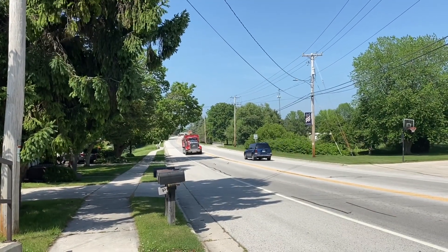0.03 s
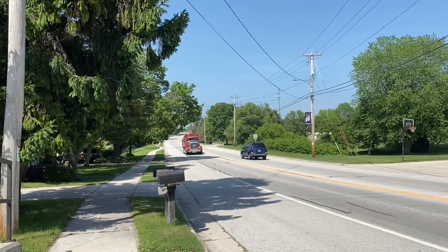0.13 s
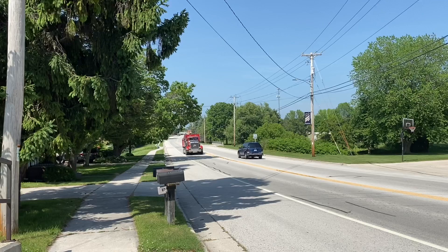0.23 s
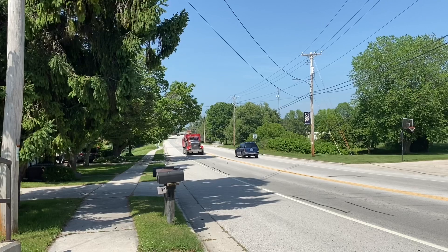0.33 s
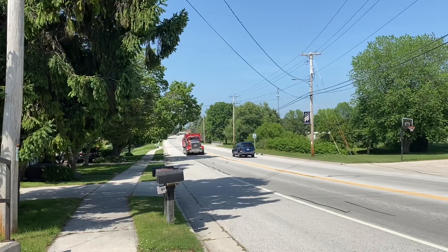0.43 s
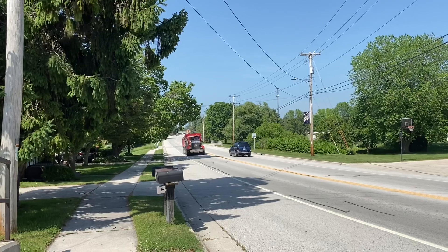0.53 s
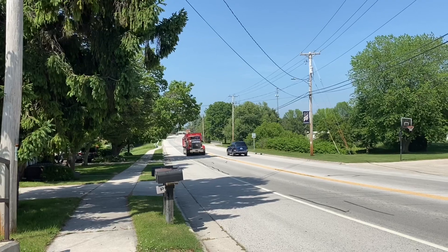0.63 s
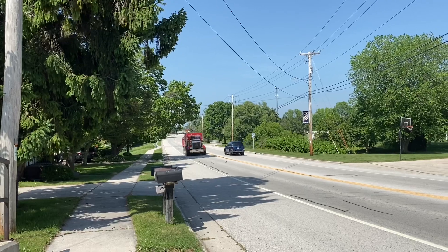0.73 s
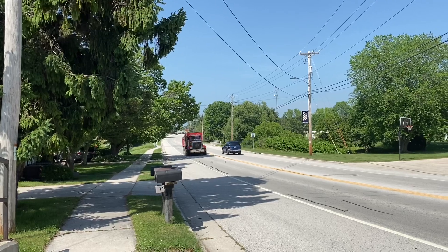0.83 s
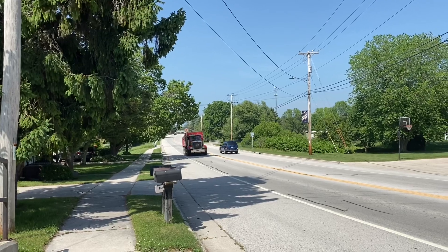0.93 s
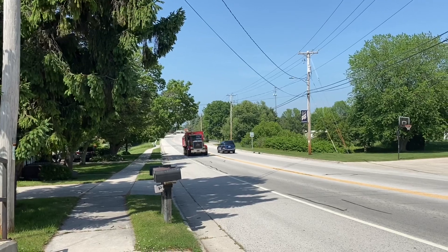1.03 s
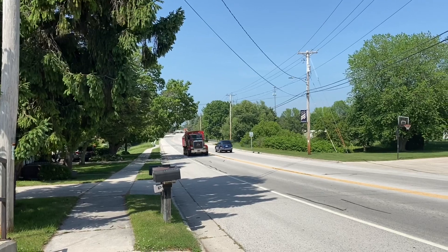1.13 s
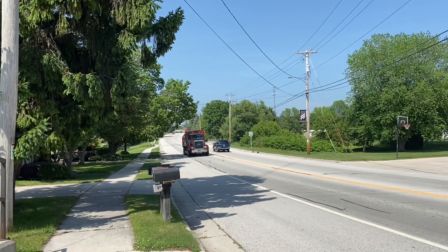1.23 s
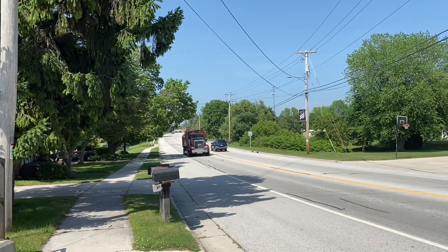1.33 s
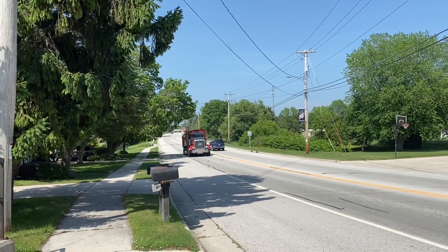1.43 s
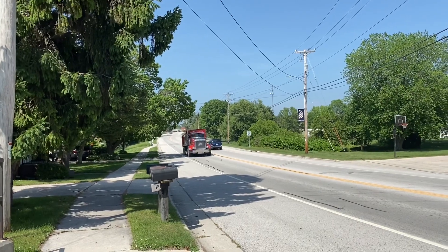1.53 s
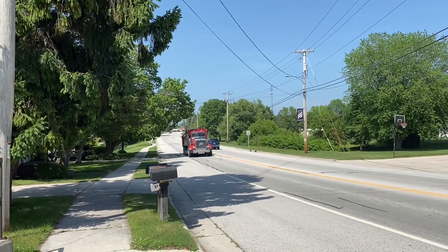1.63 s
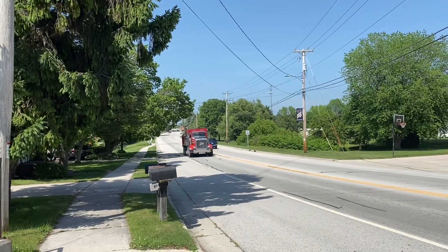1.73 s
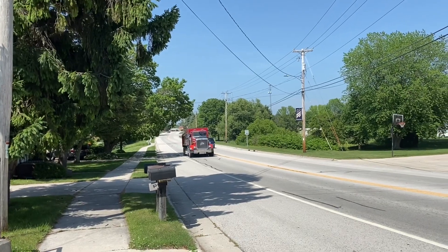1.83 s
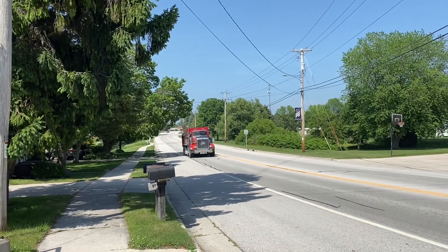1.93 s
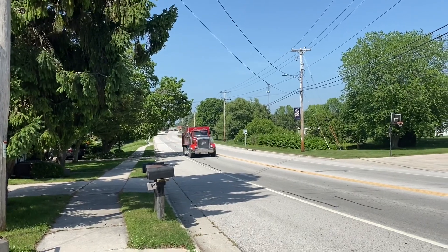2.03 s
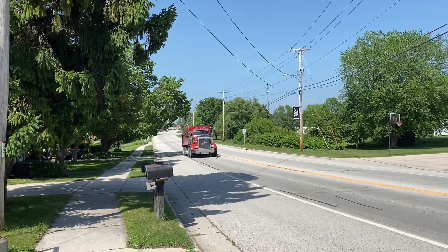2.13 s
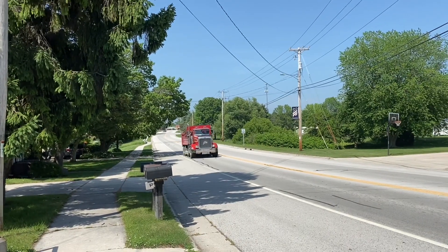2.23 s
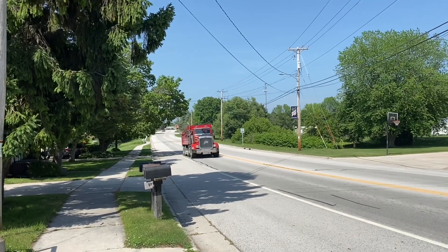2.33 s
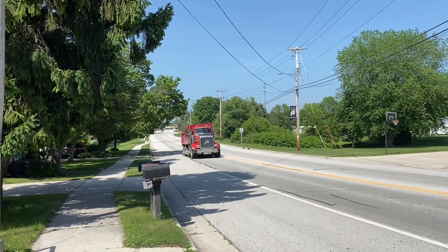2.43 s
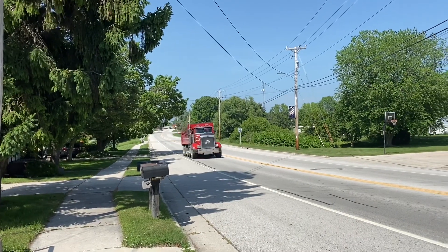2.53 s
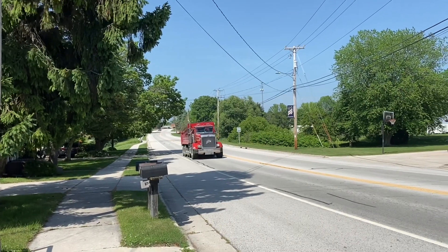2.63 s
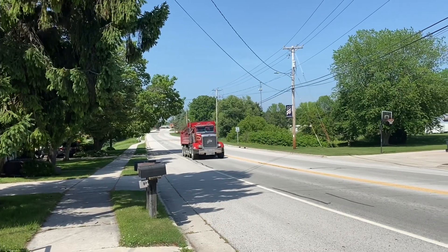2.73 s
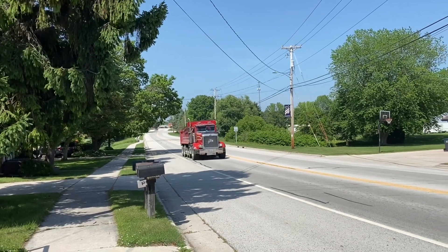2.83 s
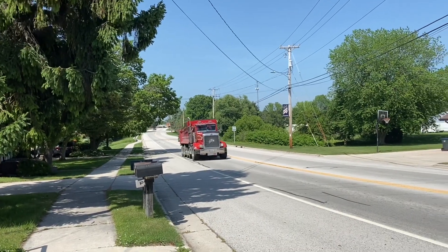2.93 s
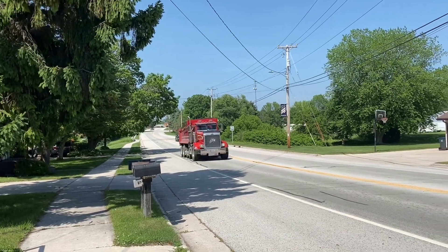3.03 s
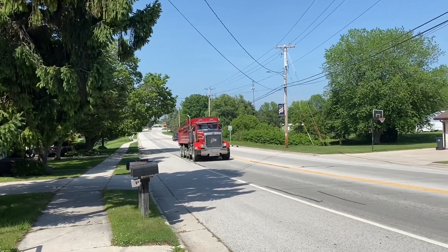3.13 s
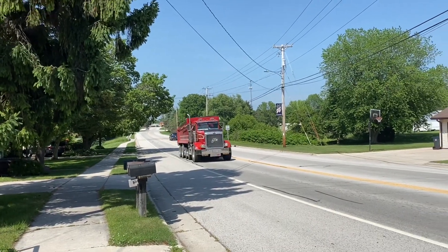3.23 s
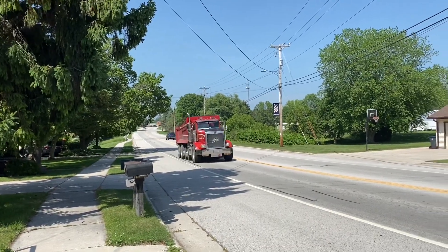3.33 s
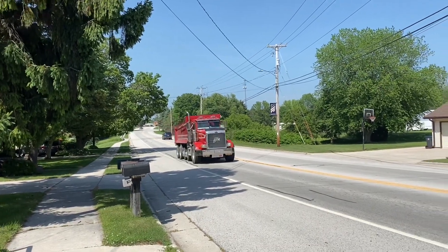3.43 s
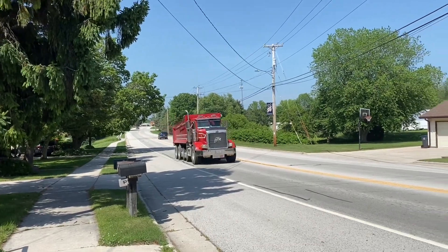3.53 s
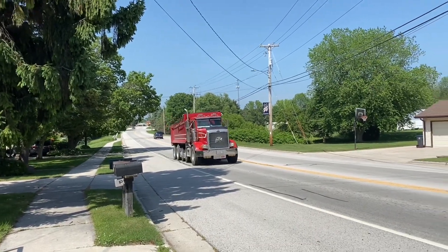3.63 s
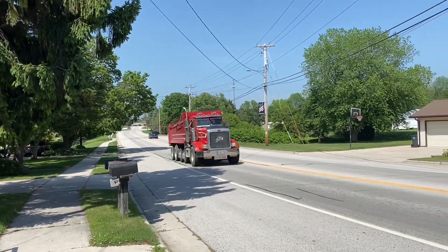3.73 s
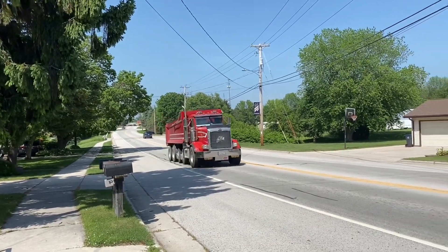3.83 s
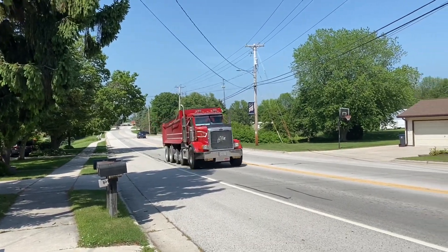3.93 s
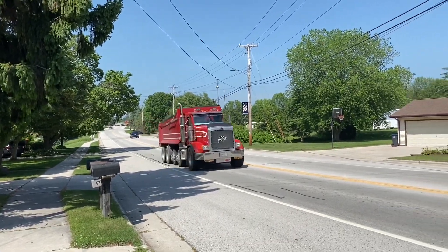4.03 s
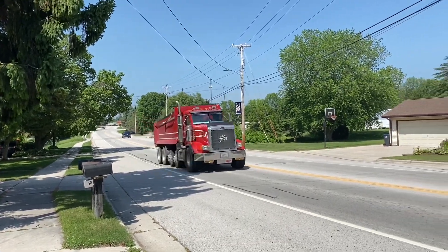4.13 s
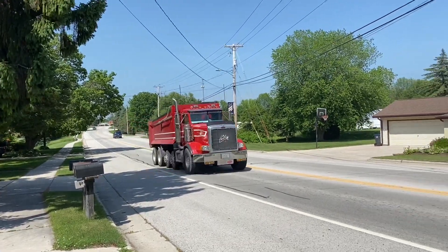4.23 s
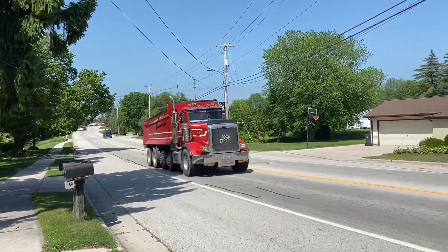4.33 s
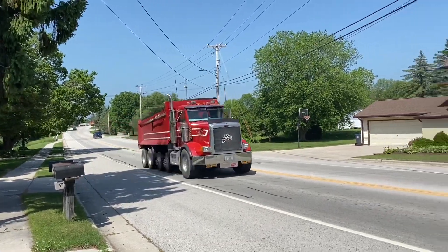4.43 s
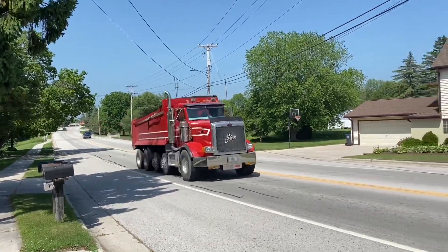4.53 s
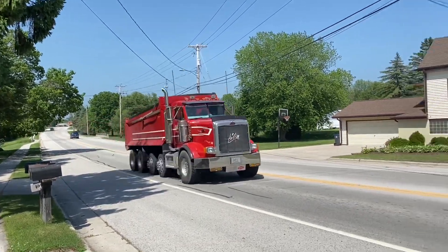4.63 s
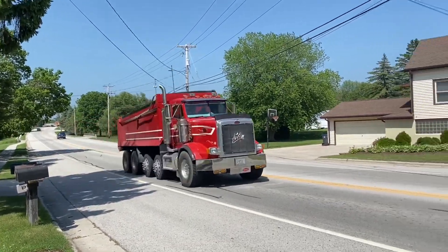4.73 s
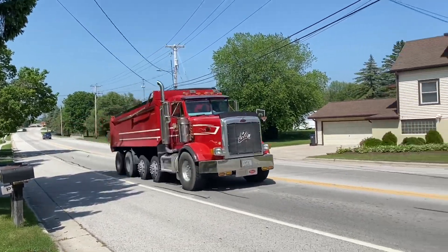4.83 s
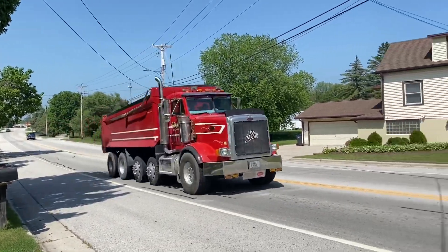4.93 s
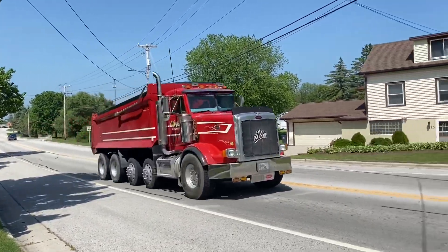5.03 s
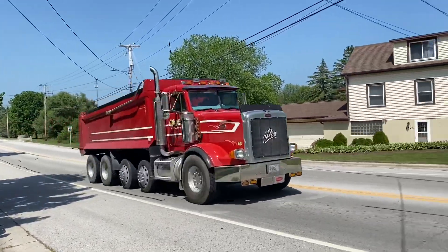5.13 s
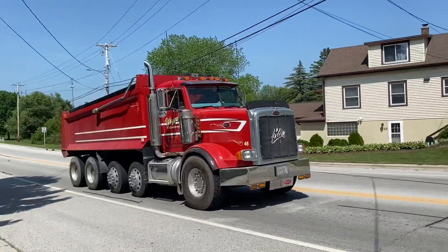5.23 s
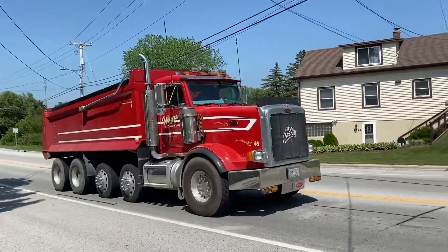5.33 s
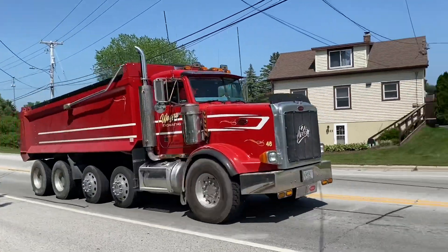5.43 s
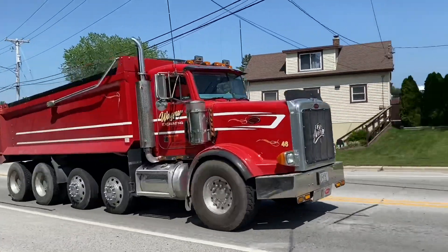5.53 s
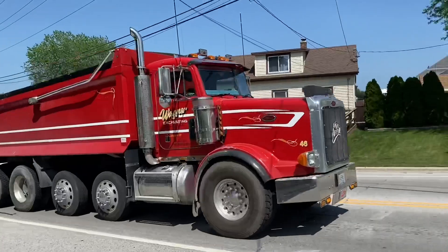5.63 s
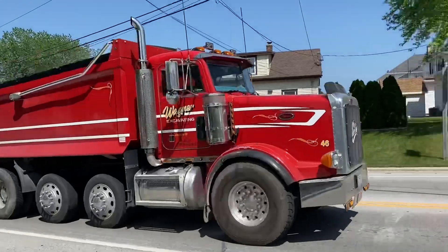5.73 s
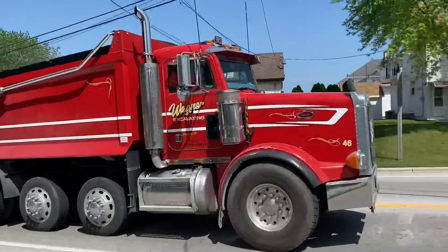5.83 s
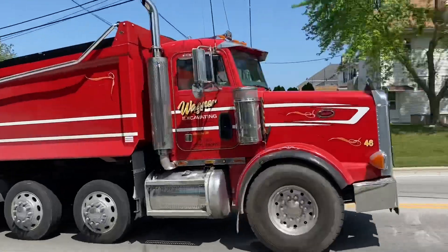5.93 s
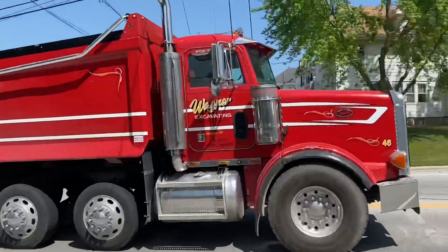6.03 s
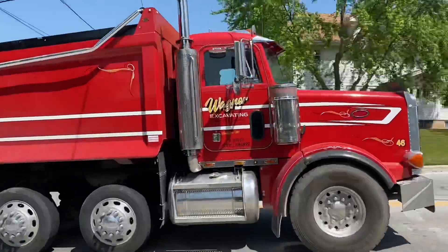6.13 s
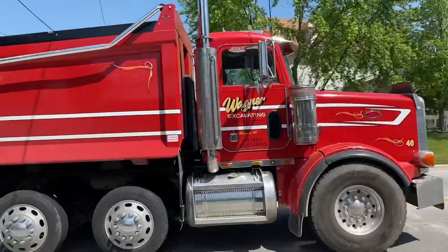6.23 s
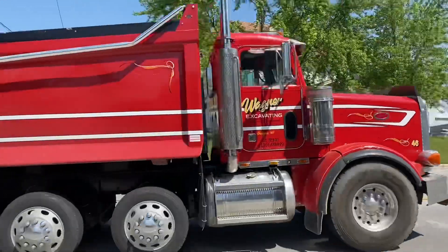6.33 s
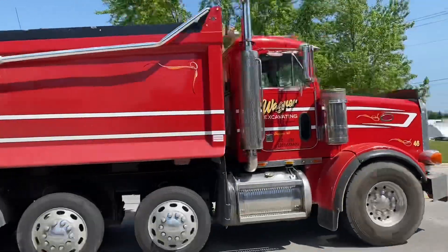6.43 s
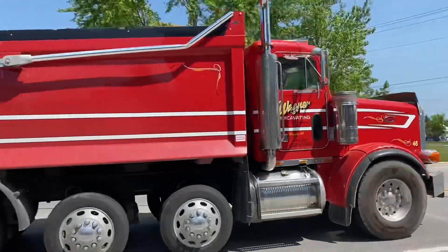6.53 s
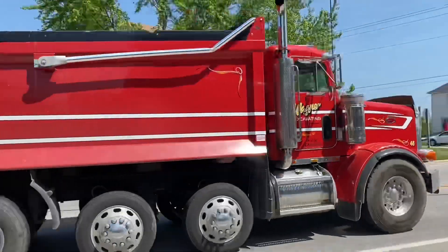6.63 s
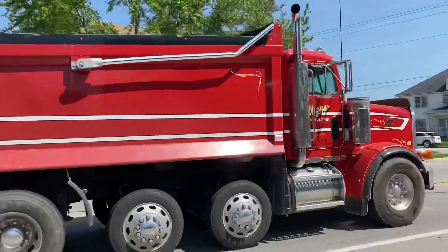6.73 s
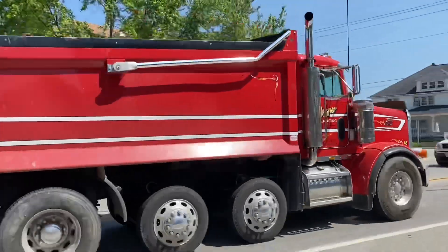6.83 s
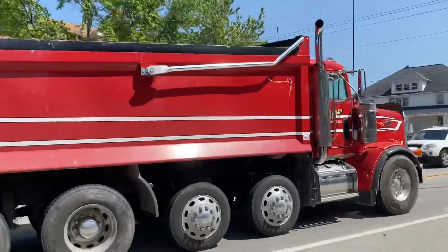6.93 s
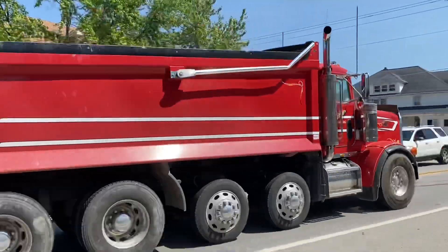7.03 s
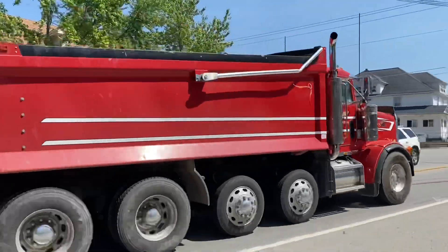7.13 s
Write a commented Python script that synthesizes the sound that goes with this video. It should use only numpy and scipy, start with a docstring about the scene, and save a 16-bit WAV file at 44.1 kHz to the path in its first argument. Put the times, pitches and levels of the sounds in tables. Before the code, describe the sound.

Outdoors on a small-town road, a large diesel dump truck nears with its engine brake on: a rapid, throaty stutter over tyre roll and faint traffic. It grows louder, harsher and slower, cracking sharply as it comes alongside. The brake suddenly lets go with a tiny air chirp; turbo whine falls, wheel brakes squeak and the engine mutters. Stereo roadside microphone, a few metres away.

```python
"""The engine brake of a dump truck, slowing on a small-town road, hammers as the truck passes close by.
Each cylinder dumps its air into the stack: a boom, a bark and a crack, combed by echoes off the road and a house.
Clicks ring the resonances of stack and muffler, and gated noise makes the rushing gas and its hiss.
Then the brake lets go, the turbo winds down as a falling band of noise and the engine mutters.
The wheel brakes squeak as wavering tones; coloured noise makes the rolling tyres and far traffic."""
import sys
import numpy as np
from scipy import signal
from scipy.fft import rfft, irfft, next_fast_len
from scipy.io import wavfile
from scipy.ndimage import uniform_filter1d, map_coordinates

SR = 44100
rng = np.random.default_rng(int(sys.argv[2]) if len(sys.argv) > 2 else 0)


def to_wav(sig):
    """Store sig (one row per channel, or 1-D mono) as 16-bit WAV at the path in sys.argv[1].

    Samples outside -1..1 are clipped; the rate is SR.
    """
    pcm = np.clip(np.atleast_2d(sig), -1, 1) * 32767
    pcm = np.round(pcm).astype(np.int16)
    wavfile.write(sys.argv[1], SR, pcm.T)  # frames by channels


N = 316638
TIME = np.arange(N) / SR

# Firing rate, three firings to a turn of the crank. Each row: time in seconds, firings per second as heard.
FIRING_RATE = [(0.0, 62.79), (0.7, 61.12), (1.4, 60.22), (2.1, 58.66), (2.8, 57.08), (3.4, 55.29),
               (4.0, 52.96), (4.5, 50.45), (4.9, 47.83), (5.3, 44.96), (5.7, 42.13), (6.12, 38.65)]
# The six cylinders in firing order. Each row: lateness in firings, then the relative levels in dB
# of its bark, its crack and its turbo chirp.
CYLINDERS = [(0.041, -3, -1.5, -1), (0.0039, 0.5, -3.5, -1), (0.013, 0, -8.5, -4), (.036, -1.5, 0, -2),
             (0.0042, 1, -4.5, 3.5), (0.015, 1.5, -7.5, -8)]
RELEASE_S = 6.125  # the driver lets the engine brake go
# The pass: moment and distance of the nearest point, and the road speed there.
NEAREST_S, NEAREST_M, TRUCK_M_PER_S, SLOWING_M_PER_S2 = 6.02, 5.0, 10.2, 1.0
STACK_HEIGHT_M, MICROPHONE_HEIGHT_M = 3.9, 1.47  # above the road
SOUND_M_PER_MS = .343


def amp(db):
    """Amplitude ratio of a level in dB."""
    return 10 ** (np.asarray(db) / 20)


def curve(rows, axis=1):
    """One column of a table, by linear interpolation in time."""
    rows = np.array(rows)
    return np.interp(TIME, rows[:, 0], rows[:, axis])


def read(points, hz):
    """A spectrum, by linear interpolation in log frequency."""
    f, value = np.transpose(points)
    return np.interp(np.log(hz + 1), np.log(f + 1), value)


def steady(x):
    """Level normalisation: divides by the slowly varying rms, shared by all channels."""
    power = np.mean(np.atleast_2d(x) ** 2, axis=0)
    smooth_power = uniform_filter1d(uniform_filter1d(power, size=7000), size=5000)
    return x / np.sqrt(abs(smooth_power) + 1e-18)


def wander(rate_hz):
    """Random modulation of rms 1: white noise through a Gaussian low-pass."""
    size, step = 16384, 20  # a coarse grid, in steps of samples
    low_pass = np.exp(-(np.fft.rfftfreq(size, step / SR) / rate_hz) ** 2)
    slow = irfft(rfft(rng.standard_normal(size)) * low_pass)
    return np.interp(TIME, np.arange(size) * step / SR, slow / slow.std())


def ring(x, spectrum):
    """Resonance of a causal body: its minimum-phase response follows from the log spectrum."""
    log_gain = np.log(amp(read(spectrum, abs(np.fft.fftfreq(8192, 1 / SR)))))
    taps = np.fft.ifft(np.exp(np.conj(signal.hilbert(log_gain)))).real[:4096]
    return signal.oaconvolve(x, taps)[:N]


def noise(spectrum, gate=1):
    """Coloured noise with partial coherence at the two ports; a gate chops it before it is coloured."""
    # Coherence of the two microphone ports. Each row: frequency in hertz, correlation from 0 to 1.
    likeness = [(60, .1), (120, .15), (240, .29), (480, .75), (950, .68), (1900, .6), (3800, .25),
                (7500, .45), (12000, .8)]
    size = next_fast_len(N)
    hz = np.fft.rfftfreq(size, 1 / SR)
    a, b = rfft(gate * rng.standard_normal((2, N)), size)
    same = np.clip(read(likeness, hz), 0, 1)
    top_cut = 1 + (hz / spectrum[-1][0]) ** 40
    shape = amp(read(spectrum, hz)) / top_cut
    pair = np.array([a, same * a + np.sqrt(1 - same ** 2) * b])
    return steady(irfft(pair * shape, size)[:, :N])


def delayed(x, ms):
    """Propagation delay of one channel, fixed or moving, by spline interpolation."""
    return map_coordinates(x, [np.arange(N) - ms * SR / 1000], order=3, mode="nearest")


def whistle(hz, width_hz):
    """Narrow-band noise: two random modulations on carriers in quadrature."""
    angle = 2 * np.pi * np.cumsum(hz) / SR
    return wander(width_hz) * np.cos(angle) + wander(width_hz) * np.sin(angle)


def travelled():
    """Metres past the nearest point, by uniformly decelerated motion."""
    since = TIME - NEAREST_S
    return TRUCK_M_PER_S * since - SLOWING_M_PER_S2 * since ** 2 / 2


def distance():
    """Metres from truck to microphone, the hypotenuse of the road geometry."""
    return np.hypot(NEAREST_M, travelled())


def passing(db, fall_db, ahead_db):
    """Spreading loss and directivity: db alongside, fall_db less per doubling, up to ahead_db more along the road."""
    far = distance() / NEAREST_M
    return amp(db - fall_db * np.log2(far) + ahead_db * (1 - 1 / far ** 2))


def detour_ms():
    """Path difference, as a delay, of the stack's echo off the road; it grows as the truck nears."""
    bounced = np.hypot(distance(), STACK_HEIGHT_M + MICROPHONE_HEIGHT_M)
    direct = np.hypot(distance(), STACK_HEIGHT_M - MICROPHONE_HEIGHT_M)
    return (bounced - direct) / SOUND_M_PER_MS


def off_road(x, strength):
    """Comb filtering: the direct sound plus its mirror image in the road."""
    return x + strength * delayed(x, detour_ms())


def off_house(x, strength):
    """Image method: a house front's echo whose sliding lag makes each partial swell and fade in turn."""
    # Mirror image of the microphone: further down the road, and off to the side of the lane.
    house_along_m, house_aside_m = 12.7, 21.5
    path_m = np.hypot(travelled() - house_along_m, house_aside_m)
    echo = delayed(x, (path_m - distance()) / SOUND_M_PER_MS)
    return x + strength * distance() / path_m * echo


def street(x, t60, wet_db):
    """Sparse scattering: trees and house fronts return a decaying tail without its deep notes."""
    t = TIME[:SR // 2]
    scatterers = rng.standard_normal((2, len(t))) * (rng.random((2, len(t))) < .04)
    taps = scatterers * (t > .02) * amp(-60 * t / t60)
    taps /= np.linalg.norm(taps, axis=1, keepdims=True)
    taps = signal.sosfilt(signal.butter(3, [300, 3000], "bandpass", fs=SR, output="sos"), taps)
    return x + amp(wet_db) * signal.oaconvolve(x, taps, axes=1)[:, :N]


def setting_in():
    """Gain ramp of the hiss and gear whines, which are faint at first and then set in."""
    start_s, rise_s, faint_db = 0.97, 0.38, -11
    return amp(faint_db * np.clip(1 - (TIME - start_s) / rise_s, 0, 1))


def braking():
    """Gate of the engine brake: 1 while it is on, 0 once it lets go."""
    return np.clip((RELEASE_S - TIME) / 0.014 + .5, 0, 1)


def firings(count, cylinder_db, scatter_db, jitter):
    """Impulse excitation: one click a firing, uneven between cylinders and scattered at random."""
    k = np.arange(int(count[-1]))
    which = k % len(CYLINDERS)
    late, size = rng.standard_normal((len(k), 2)).T
    at = np.searchsorted(count, k + np.array(CYLINDERS)[which, 0] + jitter * late)
    return np.bincount(at, amp(cylinder_db[which] + scatter_db * size), N + 1)[:N]


def puffs(count, length, base):
    """Flow modulation: a gate jumps open at each firing and sinks back over a length in firings."""
    return base + np.exp(-(count % 1) / length)


def traffic():
    """Broadband wash of distant traffic: coloured noise with a drifting level."""
    # Spectrum of the far traffic. Each row: frequency in hertz, level in dB.
    traffic_spectrum = [(20, -39), (45, 5), (90, 3.5), (150, 4.5), (200, -1), (280, -4.5), (400, -20),
                        (900, -13), (1650, -27), (2150, -24), (2650, -34), (3000, -37), (3350, -61),
                        (3750, -29), (4100, -39), (4600, -28), (5500, -34.5), (6400, -32), (7500, -39.5),
                        (12000, -66)]
    return noise(traffic_spectrum) * amp(-24.5 + .8 * wander(8))


def tyres():
    """Rolling noise: coloured noise that spreads from the passing truck and is quieter once it is past."""
    # Spectrum of the tyres. Each row: frequency in hertz, level in dB.
    tyre_spectrum = [(120, -56), (260, 1), (400, 2.5), (800, -3), (1250, -6.5), (1700, -9), (2300, -13.5),
                     (3200, -11.5), (4000, -14), (5500, -18), (7000, -20), (8200, -34), (10000, -24.5),
                     (12400, -29.5)]
    past_db = -2.4 * np.maximum(TIME - NEAREST_S, 0)
    flutter_db = .7 * wander(30)
    return noise(tyre_spectrum) * passing(db=-25.5, fall_db=5.5, ahead_db=6.0) * amp(past_db + flutter_db)


def gears():
    """Gear meshing and Doppler shift: faint whines sink as the truck slows and drop as it goes by."""
    # The two whines. Each row: pitch in hertz at the start before Doppler shift, relative level in dB.
    whines = [(3750, -42), (5050, -44)]
    sag_per_s = .0165  # share of the pitch
    doppler = 1 - np.gradient(distance()) * SR / (1000 * SOUND_M_PER_MS)
    waver = 1 + .02 * NEAREST_M / distance() * wander(9)
    pitch = (1 - sag_per_s * TIME) * doppler * waver
    tones = sum(amp(db + 2.8 * wander(14)) * whistle(hz * pitch, width_hz=90) for hz, db in whines)
    return tones * passing(db=-5.5, fall_db=4.3, ahead_db=7) * setting_in()


def squeaks():
    """Stick-slip friction: the brake linings catch and sing for a moment."""
    # Brake squeaks. Each row: middle in seconds, half-length in seconds, pitch in hertz, level in dB.
    squeak_rows = [(0.094, 0.29, 5852, -53), (0.48, 0.25, 5830, -59), (0.903, 0.21, 5720, -51),
                   (1.5, 0.5, 3760, -56.5), (5.333, 0.047, 14050, -31), (5.764, 0.046, 13800, -29),
                   (5.98, 0.081, 13990, -33), (6.246, 0.064, 13700, -34), (6.4, 0.03, 11000, -39),
                   (6.451, 0.027, 10800, -30), (6.457, 0.15, 13900, -41), (6.585, 0.031, 8900, -25),
                   (6.619, 0.022, 8800, -33)]
    out = np.zeros(N)
    wavering_s = np.cumsum(1 + 0.009 * wander(500)) / SR
    for s, half_length, hz, db in squeak_rows:
        on = abs(TIME - s) < half_length
        swell = np.cos(np.pi / 2 * (TIME[on] - s) / half_length) ** 4
        out[on] += amp(db) * np.sqrt(2) * swell * np.sin(2 * np.pi * hz * wavering_s[on])
    return out


def idle(count):
    """Impulsively excited block: with the brake off, uneven firings mutter until the throttle picks up."""
    # Spectrum of the engine block. Each row: frequency in hertz, level in dB.
    block_spectrum = [(25, -40), (40, -16), (70, 9), (100, -2.5), (140, 8), (185, -33), (290, -5),
                      (450, -18.5), (900, -56), (3000, -92)]
    idle_db, thump_db, thump_s = -28, 7, 0.054  # a last few thumps die away
    throttle_s, throttle_db_per_s = 7.06, 81
    clicks = firings(count, np.zeros(len(CYLINDERS)), scatter_db=4.0, jitter=0.0356)
    beats = steady(ring(clicks, block_spectrum))
    released = np.clip((TIME - RELEASE_S) / 0.031 + 1, 0, 1)
    dying_db = thump_db * np.exp(-np.maximum(TIME - RELEASE_S, 0) / thump_s)
    rising_db = throttle_db_per_s * np.maximum(TIME - throttle_s, 0)
    mutter = steady(beats + 0.24 * noise(block_spectrum))
    return released * mutter * amp(idle_db + dying_db + rising_db)


def chirp():
    """Frequency glide: a last spurt of air whistles sharply, drops in pitch and trails off."""
    # The escaping air. Each row: time in seconds, pitch in hertz, level in dB.
    glide = [(6.136, 5200, -60), (6.139, 5000, -20), (6.144, 4750, -31), (6.152, 4520, -36),
             (6.178, 4350, -43), (6.217, 4230, -35), (6.245, 4180, -44), (6.28, 4100, -60)]
    angle = 2 * np.pi * np.cumsum(curve(glide) * (1 + .018 * wander(350))) / SR
    sounding = (TIME > glide[0][0]) & (TIME < glide[-1][0])
    return sounding * amp(curve(glide, axis=2)) * np.sqrt(2) * np.sin(angle)


def turbo(count):
    """Rotor tone: narrow-band noise pulses with each burst, then sings and falls as it loses its drive."""
    # The coasting whistle waxes and wanes. Each row: time in seconds, level in dB.
    singing_level = [(6.14, -38), (6.24, -40), (6.37, -32.5), (6.5, -36.5), (6.63, -44), (6.73, -42),
                     (6.81, -37.5), (6.89, -44), (6.99, -40), (7.18, -44)]
    driven_hz, halving_s = 7460, 1.52  # pitch under drive, and the time to coast down to half of it
    coasting_s = np.maximum(TIME - RELEASE_S, 0)
    hz = driven_hz / (1 + coasting_s / halving_s)
    breathy = np.array([whistle(hz, width_hz=330) for _ in range(2)])
    late_count = count - .05
    cylinder_db = np.transpose(CYLINDERS)[3][np.floor(late_count).astype(int) % len(CYLINDERS)]
    driven = breathy * amp(cylinder_db) * puffs(late_count, length=0.22, base=0.11)
    driven *= passing(db=-20.5, fall_db=10, ahead_db=-21)
    flutter_db = 2.4 * wander(40)
    singing = .7 * breathy + .7 * whistle(hz, width_hz=60)
    singing *= amp(curve(singing_level) + flutter_db)
    return braking() * driven + np.clip(coasting_s / 0.014, 0, 1) * singing


def hiss(count, smear):
    """Jet noise: gas puffs hiss, and what is left in the pipe decays once the brake lets go."""
    # Spectrum of the hiss. Each row: frequency in hertz, level in dB.
    hiss_spectrum = [(1200, -6), (2400, -2.5), (2900, -23), (3550, 0), (4100, -3.5), (4800, 5),
                     (5450, -3.5), (6500, 5.5), (7300, -0.5), (8500, -9), (11200, -8), (12400, -7.5),
                     (13000, -30), (15000, -12)]
    tail_db, tail_s = -6.5, 0.44
    gas = noise(hiss_spectrum, gate=puffs(count - .12, length=0.24, base=0.6 + 1.7 * smear))
    gas *= passing(db=-24.5, fall_db=8.0, ahead_db=4.5) * setting_in() * amp(1.3 * wander(25))
    tail = amp(tail_db + 2 * wander(30)) * np.exp(-np.maximum(TIME - RELEASE_S, 0) / tail_s)
    return np.maximum(braking(), tail) * gas


def rush(count, smear):
    """Turbulent flow: gas rushes out in puffs, combed by the echo off the road."""
    # Spectrum of the rushing gas. Each row: frequency in hertz, level in dB.
    rush_spectrum = [(30, -20), (70, 2), (100, -1.5), (300, 5), (400, -0.5), (490, 2), (610, -5), (760, -8),
                     (860, -3.5), (1000, -2), (1150, -11), (1550, -10.5), (1800, -22), (2150, -12.5),
                     (3000, -38), (5000, -64)]
    gas = noise(rush_spectrum, gate=puffs(count, length=0.55, base=.15 + 0.75 * smear))
    gas = steady(np.array([off_road(side, strength=.7) for side in gas]))
    return gas * passing(db=-22.0, fall_db=6.5, ahead_db=11.0)


def muffler(count):
    """Shell resonance: every burst rings the muffler with a hollow blat, heard mostly when the truck is near."""
    # Spectrum of the muffler's shell. Each row: frequency in hertz, level in dB.
    shell_spectrum = [(250, -39), (400, -11), (480, 1), (530, 0.5), (600, -15), (680, -18), (750, -4),
                      (830, -25), (1100, -19), (3000, -68)]
    blows = firings(count, np.transpose(CYLINDERS)[1], scatter_db=1.5, jitter=.004)
    blat = off_road(steady(ring(blows, shell_spectrum)), strength=0.7)
    return blat * passing(db=-28.0, fall_db=9, ahead_db=4.5)


def cracks(count):
    """Shock fronts with short turbulent wakes leave the stack; no two ring alike, and some hit harder."""
    # Spectrum of a crack. Each row: frequency in hertz, level in dB.
    crack_spectrum = [(250, -38), (400, -6.5), (500, 2), (610, 0), (690, 3.5), (760, 11.5), (860, -2),
                      (1010, 9), (1140, 0), (1280, 4), (1420, -8.5), (1560, 0), (1780, -23), (2120, -10.5),
                      (3000, -33), (6000, -46), (13000, -75)]
    # Level of the cracks. Each row: time in seconds, level in dB.
    crack_level = [(0.0, -42), (0.5, -40), (1.2, -44), (2.2, -39), (2.8, -33), (3.3, -27.5), (4.0, -28.5),
                   (4.7, -25), (5.2, -24), (5.6, -24.5), (6.05, -27.5)]
    # Single firings louder or softer than their neighbours. Each row: time in seconds, change of level in dB.
    uneven_cracks = [(3.04, 3), (3.185, 2), (3.346, 1), (3.401, 4.5), (3.51, 1.5), (3.62, 1.5), (3.675, 2),
                     (3.73, 2.5), (3.842, 2), (3.955, 3.5), (4.01, 1), (4.068, 1), (4.535, 1), (4.655, 3),
                     (4.778, 2.5), (4.965, -1), (5.027, 1.5), (5.245, 3), (5.422, 2.5), (5.492, 9)]
    pitch_waver = .015  # share by which gusts of hot gas bend the ring up and down
    evening_out = .45  # share of the weaker cylinders' deficit in dB that is made up alongside
    crack_db, samples = np.transpose(CYLINDERS)[2], np.arange(N)
    # ringing on a wavering clock bends the pitch but not the firing times
    clock = np.cumsum(1 + pitch_waver * wander(25))
    clock *= (N - 1) / clock[-1]
    bent_count = np.interp(samples, clock, count)
    shocks = firings(bent_count + .045, crack_db, scatter_db=1.8, jitter=.003)
    which = np.round(bent_count).astype(int) % len(CYLINDERS)
    deficit_db = crack_db.max() - crack_db[which]
    shocks = shocks * amp(evening_out * NEAREST_M / distance() * deficit_db)
    wake = signal.lfilter([1], [1, -np.exp(-1 / (SR * .004))], shocks) * rng.standard_normal(N)
    crack = np.interp(clock, samples, ring(shocks + .028 * wake, crack_spectrum))
    # as the truck nears, the direct crack comes a little early and its road echo a little late
    crack = delayed(off_road(crack, strength=.8), -.6 * detour_ms())
    change_db = sum(db * np.exp(-((TIME - s - .003) / .01) ** 4) for s, db in uneven_cracks)
    return steady(off_house(crack * amp(change_db), strength=0.37)) * amp(curve(crack_level))


def bark(count):
    """Pipe resonance: firings ring the stack, whose resonances sink as the truck draws alongside."""
    # Spectrum of the stack. Each row: frequency in hertz, level in dB.
    stack_spectrum = [(28, -82), (42, -68), (60, -33), (80, -22), (110, -28), (135, -16.5), (160, -21.5),
                      (185, -22.5), (205, -19.5), (225, -21), (245, -29), (270, -19.5), (300, -36.5),
                      (335, -36.5), (400, -54.5), (700, -76.5), (3000, -130)]
    stack_sink = 0.018  # share by which the resonances drop
    samples = np.arange(N)
    clock = np.cumsum(1 - stack_sink * (NEAREST_M / distance()) ** 4)
    bent_count = np.interp(samples, clock, count)
    clicks = firings(bent_count, np.transpose(CYLINDERS)[1], scatter_db=.5, jitter=.005)
    blast = np.interp(clock, samples, ring(clicks, stack_spectrum))
    blast = off_house(off_road(delayed(blast, 1.45), strength=0.61), strength=0.69)
    fullness = SR / curve(FIRING_RATE)  # a slower engine gives fuller bursts
    return blast * passing(db=-6.0, fall_db=4, ahead_db=11.0) * fullness


def boom(count):
    """Fundamental of the firing rate: a deep tone that trails the bursts and rings down on release."""
    # Level of the deep firing note. Each row: time in seconds, level in dB.
    boom_level = [(0.0, -32), (0.85, -23), (2.45, -22), (3.08, -18), (3.6, -23), (3.92, -16), (4.22, -22),
                  (4.39, -15), (5.67, -18), (6.02, -21)]
    # the deep note builds up slowly and so trails the bursts
    tone = np.sqrt(2) * np.cos(2 * np.pi * delayed(count, 26.5))
    ring_down = np.exp(-np.maximum(TIME - RELEASE_S, 0) / 0.092)
    return tone * amp(curve(boom_level) + 0.98 * wander(5.5)) * ring_down


def engine_brake(count):
    """Sudden expansion: compressed air bursts into the stack until the driver lets go."""
    smear = 1 - NEAREST_M / distance()  # far away the puffs run together
    bursts = bark(count) + cracks(count) + muffler(count) + rush(count, smear)
    return boom(count) + braking() * bursts + hiss(count, smear)


def scene():
    """Superposition of all sources, with a small lag between the two ports and a street tail."""
    # The ports are turned after the truck, then let it go. Each row: time in seconds, lag of the right in ms.
    bearing = [(0, 0.093), (6.0, 0.1), (7.18, 0.023)]
    first_firing = .758  # in firings after the start
    count = np.cumsum(curve(FIRING_RATE)) / SR - first_firing  # running count of the firings
    left, right = engine_brake(count) + idle(count) + tyres() + traffic() + gears()
    # these stand almost straight ahead, so their lag is small
    near_left, near_right = turbo(count) + chirp() + squeaks()
    ports = np.array([left + near_left, delayed(right, curve(bearing)) + delayed(near_right, .032)])
    return street(ports, t60=.5, wet_db=-13)


def record(dry):
    """Transducer response: each port has its own colour, the highest peaks round off, the band is limited."""
    # Imbalance of the ports. Each row: frequency in hertz, left minus right in dB.
    tilt = [(30, -0.5), (125, -2), (250, 0.1), (500, 2), (1100, 3.5), (2200, 0), (4400, -3.5), (8000, 2),
            (15000, -2.5)]
    top_hz = 14700
    size = next_fast_len(N)
    tilt_db = read(tilt, np.fft.rfftfreq(size, 1 / SR))
    port_gain = amp(np.array([tilt_db, -tilt_db]) / 2)
    coloured = irfft(rfft(dry, size) * port_gain, size)[:, :N]
    rounded = coloured / (1 + abs(coloured / .98) ** 10) ** .1
    low_pass = signal.firwin(511, top_hz, window=("kaiser", 9), fs=SR)
    return signal.oaconvolve(rounded, low_pass[None], "same")


dry = scene()
out = record(dry)
to_wav(out)
```